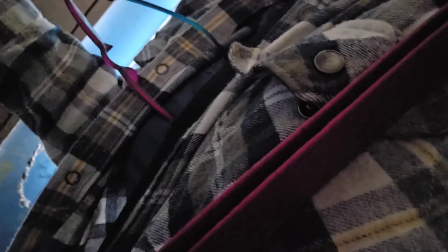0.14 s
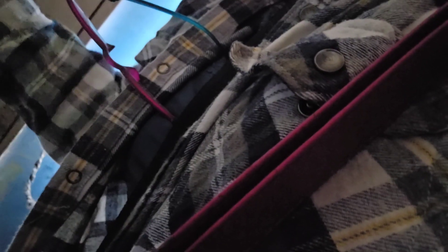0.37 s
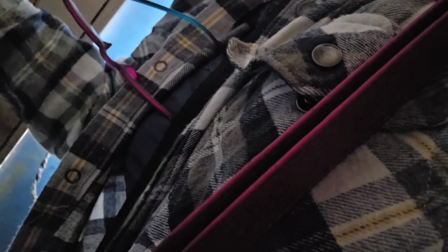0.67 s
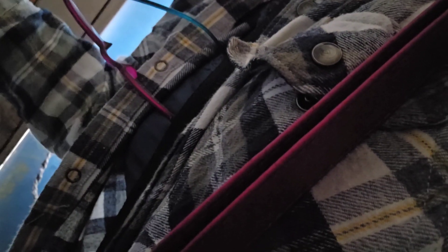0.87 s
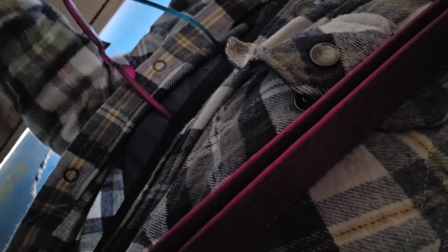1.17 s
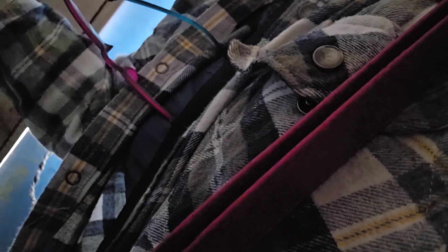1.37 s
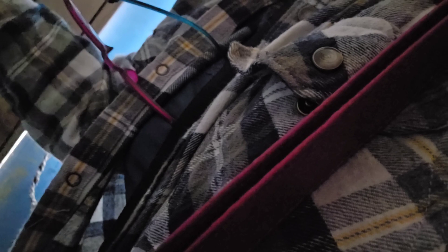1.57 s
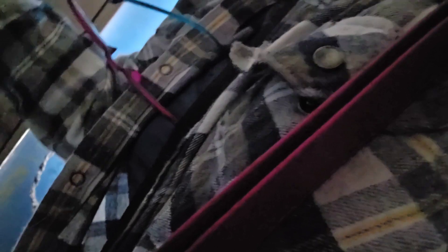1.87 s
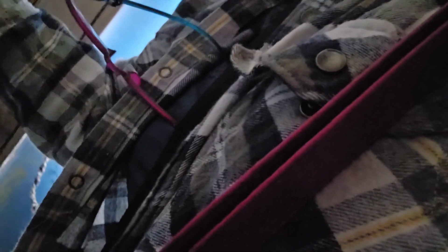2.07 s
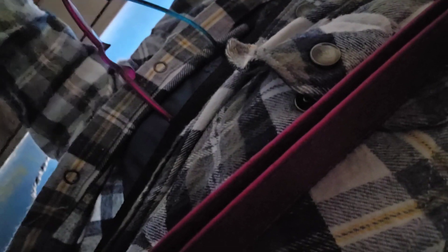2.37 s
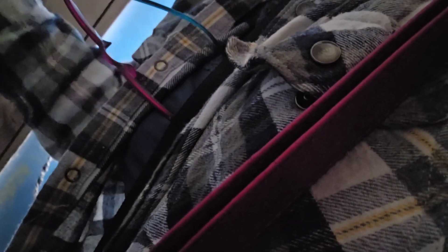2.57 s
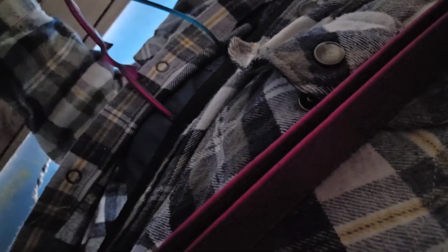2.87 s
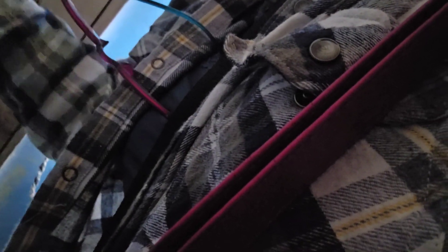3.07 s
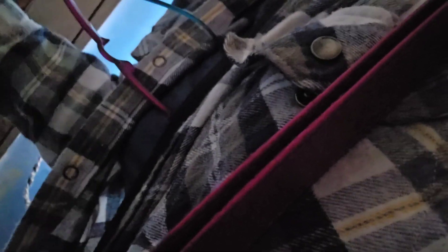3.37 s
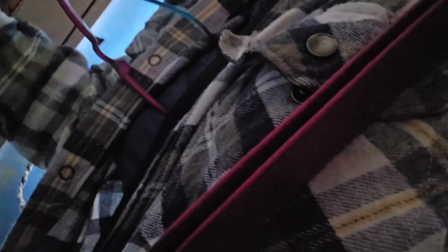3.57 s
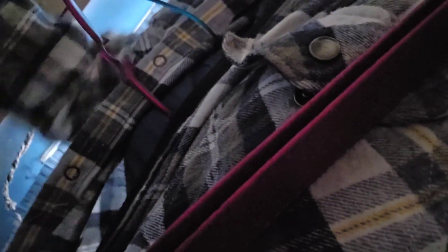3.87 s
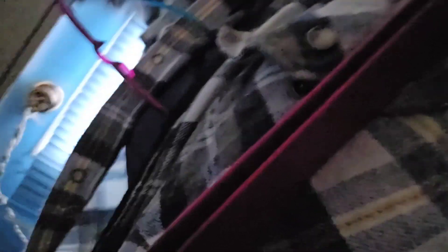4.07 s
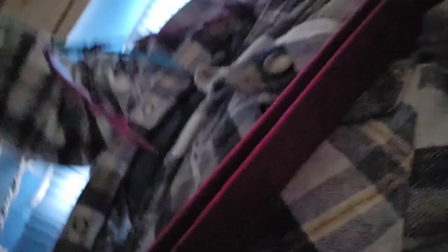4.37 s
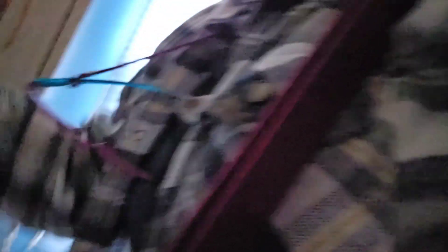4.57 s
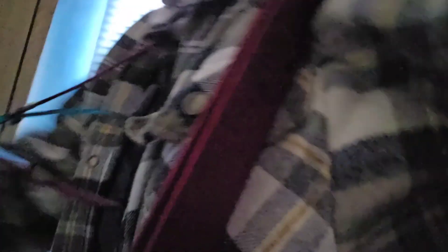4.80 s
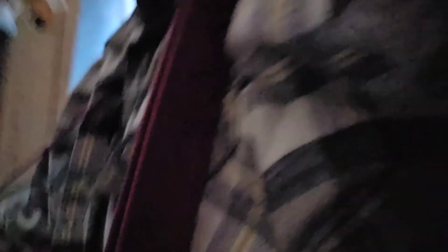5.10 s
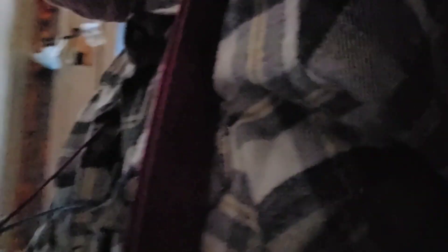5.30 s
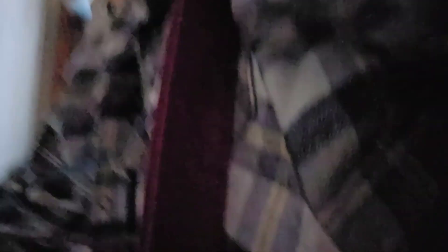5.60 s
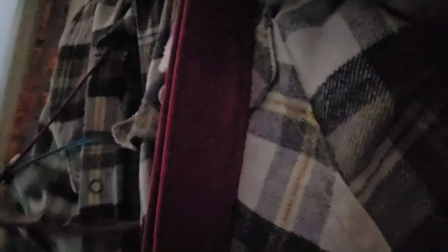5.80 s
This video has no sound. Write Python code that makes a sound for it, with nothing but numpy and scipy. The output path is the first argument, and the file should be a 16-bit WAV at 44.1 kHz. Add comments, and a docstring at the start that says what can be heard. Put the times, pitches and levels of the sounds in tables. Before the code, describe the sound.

Very close stereo pickup of shirts being pushed along a closet rail: thin, quickly damped metal clinks and scrapes, quieter light plastic ticks, then a busier run of chattering hooks with brushing cloth and muffled handling rumble. The last second has dull, woody hanger knocks, a short rough rising squeak and more rustle. The space is dry, with sound slightly stronger and brighter on the left.

```python
"""In a small closet, flannel shirts on plastic hangers are shoved in short strokes along a rail, right at the microphone.
Wire hooks ring in decaying sine modes and scrape in random slips; plastic arms tick and knock in short noise bursts.
Cloth rustles as dense coloured grains, and handling adds low noise bumps, rubbing and rumble.
Near the end one hook drags along the rail with a rising stick-slip squeak.
Levels in the tables are relative: each layer adds its own offset."""
import sys
import numpy as np
from scipy import signal
from scipy.fft import rfft, irfft, next_fast_len
from scipy.io import wavfile
from scipy.ndimage import map_coordinates

SR = 44100
rng = np.random.default_rng(int(sys.argv[2]) if len(sys.argv) > 2 else 0)


def store_pcm(level_fs):
    """Save levels as 16-bit WAV."""
    pcm = np.round(np.clip(level_fs, -1, 1) * 32767).astype(np.int16)
    wavfile.write(sys.argv[1], SR, np.atleast_2d(pcm).T)


N = 262218
TIME = np.arange(N) / SR
PUSHED_FROM_S = 3.2  # from here on the nearest hook is pushed along the rail

# ringing modes of the wire hook: (frequency [Hz], level [dB], t60 [s])
HOOK_MODES = [(2255,1.5,0.03),(4341,3.5,0.2),(5383,3.5,0.042),(7570,-6.5,0.11),(8655,-10.5,0.3),(9420,3.5,0.029),(9703,-14,0.12),(11230,-36.5,0.019),(12600,-1,.08),(13010,-21,0.33),(12607,-5,0.054),(12772,-1,0.11),(15000,-26,.05)]
# colour of a metal contact's crack: (frequency [Hz], level [dB])
CRACK_COLOUR = [(600,-34),(1700,-20.5),(2300,1.5),(3200,0),(6200,1),(9000,9.5),(10900,-1),(12500,-3.5),(15400,9.5),(16200,-31.5)]
# colour of a light, dry snap: (frequency [Hz], level [dB])
SNAP_COLOUR = [(500,-10),(1500,-6),(3000,2.5),(7500,3),(11000,0.5),(15300,-4.5),(16200,-44)]
# colour of a woody plastic body, also of brushed cloth: (frequency [Hz], level [dB])
BODY_COLOUR = [(250,-15.5),(600,2.5),(950,2.5),(1500,5),(2000,-2.5),(3300,-11.5),(6000,-70.5)]
# colour of a knock's crack and of the squeak's rasp: (frequency [Hz], level [dB])
KNOCK_COLOUR = [(1500,-4.5),(2300,1.5),(3300,0),(5000,-6),(8000,-8),(15000,-20)]


def from_db(db):
    """Decibels to gain."""
    return 10 ** (np.asarray(db) / 20)


def rms_one(x):
    """Scale to unit rms."""
    return x / np.sqrt(np.mean(x ** 2) + 1e-20)


def in_time(rows):
    """The columns of a curve, interpolated at every sample."""
    s, *columns = np.transpose(rows)
    return [np.interp(TIME, s, c) for c in columns]


def coloured(x, points, share=1):
    """Filter by a (Hz, dB) curve drawn over log frequency; share scales its decibels."""
    hz, db = np.transpose(points)
    size = next_fast_len(N)
    log_hz = np.log(np.arange(size // 2 + 1) * SR / size + 1)
    gain = from_db(share * np.interp(log_hz, np.log(hz), db))
    return irfft(rfft(x, size) * gain, size)[..., :N]


def pair(draws, alike):
    """Two unrelated signals become a left and a right that are partly alike."""
    alike = np.clip(alike, 0, 1)
    middle = np.sqrt(1 + alike) * draws[0]
    side = np.sqrt(1 - alike) * draws[1]
    return (middle + side * [[1], [-1]]) / np.sqrt(2)


def noise(points, alike):
    """Stereo noise of a given colour, rms 1."""
    return rms_one(coloured(pair(rng.standard_normal((2, N)), alike), points))


def drift(rate):
    """Random wander, rms 1, through `rate` new values per second."""
    knots = rng.standard_normal(N // 16)
    return rms_one(np.interp(TIME * rate, np.arange(len(knots)), knots))


def clicks(s, gains):
    """Impulses at the given times."""
    out = np.zeros(N)
    np.add.at(out, np.clip(np.round(s * SR).astype(int), 0, N - 1), gains)
    return out


def ring(force, hz, t60):
    """A two-pole resonator: a unit click sets a decaying sine of starting height 1 ringing."""
    r = from_db(-60 / (t60 * SR))
    w = 2 * np.pi * hz / SR
    return signal.lfilter([0, np.sin(w)], [1, -2 * r * np.cos(w), r * r], force + 1e-18)


def bursts(s, db, t60, rise, hold=0):
    """Envelope of blows or strokes that swell (60 dB per rise), may hold, and die away; their powers add."""
    power = np.zeros(N)
    for at, level, decay, swell, held in np.broadcast(s, db, t60, rise, hold):
        part = slice(max(int((at - 2 * swell) * SR), 0), int((at + held + 2 * decay) * SR))
        age = TIME[part] - at
        away = np.maximum((age - held) / decay, -age / swell)
        power[part] += from_db(level - 60 * np.maximum(away, 0)) ** 2
    return np.sqrt(power)


def grains(per_s, spread_db):
    """Random tiny slips of very uneven size, rms 1."""
    sizes = from_db(spread_db * np.minimum(rng.exponential(1, N), 3))
    struck = rng.random(N) < per_s / SR
    return rms_one(sizes * struck * pair(rng.standard_normal((2, N)), alike=0.096))


def gripped(pull):
    """The hook's modes under a grip that pulls the highest ones sharp."""
    top_hz = HOOK_MODES[-2][0]
    return [(hz * (1 + pull * (hz / top_hz) ** 4), db, t60) for hz, db, t60 in HOOK_MODES]


def hook_hits(hits, modes, low_hz, high_hz, ring_db, chatter_db, chatter_t60, crack_db, crack_t60, vary_db):
    """Where a wire hook is hit decides how its low and high modes share the blow; it then chatters on the rail."""
    s, high, low, crack = np.transpose(hits)
    crack_level = bursts(s, crack + crack_db, crack_t60, 0.0056)
    out = noise(CRACK_COLOUR, alike=0.13) * crack_level * from_db(3.56 * drift(400))
    rebounds = grains(per_s=2400, spread_db=11) / np.sqrt(SR * chatter_t60)
    for hz, db, t60 in modes:
        share = np.clip((hz - low_hz) / (high_hz - low_hz), 0, 1)
        chance = rng.standard_normal((len(s), 3))
        bright = crack + share * (high - crack)
        # the hook's main bending mode has a strength of its own
        bending = np.exp(-(np.log2(hz / low_hz) / .2) ** 2)
        level = bending * low + (1 - bending) * bright + db + ring_db
        # each side varies a little in level; both share a random sign
        sign = np.sign(chance[:, 2])
        blow = np.array([clicks(s, from_db(level + vary_db * side) * sign) for side in chance.T[:2]])
        chatter = rebounds * bursts(s, level + chatter_db, chatter_t60, 0.008)
        out += ring(blow + chatter, hz, t60)
    return out


def near_hook(free_db, low_lift_db, pushed_db, detune, snap_db, snap_t60):
    """Free hits ring with faint chatter, pushed hits chatter strongly; each group alternates two grip pitches."""
    # the nearest hook strikes the rail: (time [s], high ring level [dB], low ring level [dB])
    clinks = [(0.0998, -29, -67), (0.1558, -23, -63), (0.2103, -11.5, -48), (0.2341, -3.5, -38.5),
              (0.3369, -16, -82), (0.348, -20, -48), (0.545, -11.5, -62), (0.571, -16, -58),
              (0.6486, -58, -83), (0.789, -12.5, -53), (1.1938, -19.5, -55), (1.2253, -6.5, -45),
              (1.234, -6, -56), (1.3252, -45, -54), (1.354, -31, -69), (1.52, -42, -64),
              (1.5826, -16.5, -36), (1.877, -66, -66), (1.9363, -36.5, -64), (2.143, -39, -72),
              (2.357, -36, -64), (2.4117, -50, -73), (2.5247, -64, -54.5), (2.7795, -48, -46.5),
              (2.9574, -19, -47), (2.971, -26, -49), (3.232, -23.5, -40), (3.3696, -16.5, -61),
              (3.4615, -16, -55), (3.5328, -9, -42), (3.603, -14.5, -57), (3.6827, -12.5, -49),
              (3.7611, -23, -69), (3.829, -17.5, -72), (3.9096, -16.5, -67), (4.066, -21, -57),
              (4.0955, -14.5, -38), (4.1732, -11, -28), (4.2383, -8.5, -51), (4.2702, -6, -59),
              (4.285, -18, -67), (4.324, -28, -57), (4.4168, -31, -43), (4.4362, -9, -31),
              (4.501, -27.5, -55), (4.579, -10, -72), (4.6072, -12, -46), (4.655, -19, -36)]
    # the contact cracks harder the more the hook rings: [dB] at a mean ring of 0 dB, and dB per dB of ring
    crack_at_full_db, crack_growth = -21.5, 0.51
    s, high, low = np.transpose(clinks)
    crack = crack_at_full_db + crack_growth * (high + low) / 2
    hits = np.transpose([s, high, low, crack])
    free = hits[s < PUSHED_FROM_S] + [0, 0, low_lift_db, 0]
    pushed = hits[s >= PUSHED_FROM_S]
    out = noise(SNAP_COLOUR, alike=0.13) * bursts(s, high + snap_db, snap_t60, .002)
    for k, pull in enumerate((detune, 3 * detune)):
        out += hook_hits(free[k::2], gripped(pull), low_hz=4300, high_hz=14000, ring_db=free_db, chatter_db=-5,
                         chatter_t60=0.11, crack_db=5.0, crack_t60=0.015, vary_db=-0.5)
        out += hook_hits(pushed[k::2], gripped(pull), low_hz=4400, high_hz=12900, ring_db=pushed_db,
                         chatter_db=6, chatter_t60=.08, crack_db=3, crack_t60=.05, vary_db=1.5)
    return out


def neighbour_hook():
    """A neighbouring hook, thinner in tone, rings in its own modes and chatters."""
    # its hits: (time [s], high ring level [dB], low ring level [dB], contact crack level [dB])
    zings = [(0.0893, -14.5, -45, -74), (3.3405, -10.5, -50, -34.5), (3.7964, -19, -46, -65),
             (4.7272, -10, -42, -33), (4.8562, -18, -45, -40), (4.9207, -47, -54, -47),
             (5.0389, -18, -46, -31), (5.0568, -6, -48, -30), (5.1562, -33, -34, -31),
             (5.2169, -39, -56, -42.5)]
    # its modes: (frequency [Hz], level [dB], t60 [s])
    thin_modes = [(6400,10,0.011),(8280,-36,.08),(10500,12,0.09),(11840,5.5,0.05),(15100,-5.5,.06),(14300,-17,0.036)]
    return hook_hits(zings, thin_modes, low_hz=10400, high_hz=15000, ring_db=-8, chatter_db=13,
                     chatter_t60=0.036, crack_db=0, crack_t60=.075, vary_db=2)


def shove_strokes():
    """Each shove slides the hooks and drags the shirts: the envelopes of scrape and rustle."""
    # (time [s], length [s], hook scrape level [dB], cloth rustle level [dB])
    strokes = [(0.0, 0.0053, -50, -46), (0.101, 0.14, -47, -47), (0.553, 0.018, -47, -48.5),
               (0.694, 0.1, -51, -50.5), (1.446, 0.032, -68, -71), (3.282, 0.068, -48, -42),
               (3.454, 0.023, -44, -47), (3.583, 0.027, -39, -75), (3.68, .03, -38, -38.5),
               (3.864, 0.046, -38, -46.5), (4.01, 0.13, -46, -40), (4.2, 0.068, -48, -42.5),
               (4.412, 0.04, -48, -31.5), (4.648, 0.054, -35.5, -35.5), (4.822, 0.02, -95, -46),
               (5.798, 0.24, -47, -39)]
    build_s, settle_s = .15, .34  # time to swell and to die away by 60 dB
    s, length, *levels = np.transpose(strokes)
    return [bursts(s, db, settle_s, build_s, length) for db in levels]


def hook_scrape(level, damping, flutter_db, tilt_db, rasp_db, wander_db):
    """A sliding hook is plucked by many slips; pressed on the rail, it rings shorter and brighter, mode by mode."""
    slips = grains(per_s=830, spread_db=4)
    tones = 0
    for k, (hz, db, t60) in enumerate(gripped(pull=0.021)):
        tilt = tilt_db * np.log2(hz / HOOK_MODES[-1][0])
        gain = from_db(db + tilt + wander_db * drift(25))
        tones = tones + (-1) ** k * gain * ring(slips, hz, t60 * damping)
    rasp = from_db(rasp_db) * rms_one(coloured(slips, CRACK_COLOUR))
    return (rms_one(tones) + rasp) * level * from_db(flutter_db * drift(90))


def light_taps(per_s, level_db, damping):
    """The idle hooks keep touching the rail, faintly and at random."""
    touches = rng.random(N) < per_s / SR
    out = np.zeros(N)
    for hz, db, t60 in HOOK_MODES:
        out += ring(touches * from_db(level_db + db / 2) * rng.standard_normal(N), hz, t60 * damping)
    return out


def squeak(level_db, overtone_db, flutter_db, rasp_db):
    """Stick-slip at an unsteady rate gives a thin, rough tone over a dry rasp; overtones fall by the octave."""
    # the slips come faster as the hook gathers speed: (time [s], mean pitch [Hz])
    glide = [(5.62, 1392), (5.655, 1500), (5.708, 2078), (5.8, 2084), (5.84, 2254), (5.9, 2323)]
    from_s, hold_s, fade_s = 5.63, .225, .2  # full strength, how long it holds, 60 dB swell or fade
    hz, = in_time(glide)
    phase = 2 * np.pi * np.cumsum(hz * (1 + .052 * drift(1500))) / SR
    tone = np.zeros(N)
    for k in range(1, 6):
        tone += from_db(overtone_db * np.log2(k) + flutter_db * drift(220)) * np.sin(k * phase)
    rasp = from_db(rasp_db) * noise(KNOCK_COLOUR, alike=0.092)
    return (tone * from_db(3 * drift(45)) + rasp) * bursts(from_s, level_db, fade_s, fade_s, hold_s)


def ticks(tick_db, body_db, tick_t60, body_t60):
    """Light plastic contacts of arms and buttons: a dry snap with a little body."""
    # (time [s], snap level [dB], woody body level [dB])
    contacts = [(0.9003, -41, -44.5), (1.7404, -27.5, -90), (1.7856, -39.5, -59), (1.9983, -31.5, -40),
                (2.0424, -43, -53.5), (2.1916, -45.5, -45.5), (2.2625, -71, -46), (2.288, -39.5, -62),
                (2.78, -33, -43), (2.796, -29.5, -59), (2.822, -37, -58), (3.2981, -32.5, -39.5),
                (3.5726, -22, -69), (4.4, -56, -31), (4.6822, -22, -39), (4.7185, -19.5, -36),
                (4.7604, -27, -70), (4.8304, -24, -77)]
    s, snap, body = np.transpose(contacts)
    out = noise(SNAP_COLOUR, alike=0.083) * bursts(s, snap + tick_db, tick_t60, 0.00033)
    return out + noise(BODY_COLOUR, alike=0.97) * bursts(s, body + body_db, body_t60, 0.0012)


def knocks(ring_db, clack_db, crack_db, clack_t60, crack_t60, swell):
    """Heavy contacts ring the hanger arms, muffled by the shirts on them."""
    # hangers knock together: (time [s], level [dB], crack level [dB])
    collisions = [(5.074, -16, -35), (5.081, -19.5, -29), (5.143, -29, -51), (5.299, -35, -40.5),
                  (5.376, -29.5, -36), (5.454, -28.5, -32.5), (5.482, -16.5, -32), (5.545, -27.5, -32.5),
                  (5.581, -23.5, -28), (5.722, -31, -30), (5.928, -18.5, -27.5)]
    # modes of a loaded hanger: (frequency [Hz], level [dB], t60 [s])
    arm_modes = [(770,-6,.08),(912,-10,.05),(1200,-8,.06),(1380,-2,.035),(1495,5,.06),(1640,-3,.03),(3180,-16,.03)]
    s, level, crack = np.transpose(collisions)
    out = noise(BODY_COLOUR, alike=0.077) * bursts(s, level + clack_db, clack_t60, swell)
    out += noise(KNOCK_COLOUR, alike=0.057) * bursts(s, crack + crack_db, crack_t60, swell)
    for hz, db, t60 in arm_modes:
        chance_db = 6.8 * rng.standard_normal(len(s))
        out += ring(clicks(s, from_db(level + db + ring_db + chance_db)), hz, t60)
    return out


def cloth(level, colour, clump_db):
    """Fibres catch and let go in clumps."""
    fibres = grains(per_s=17000, spread_db=4.0) * from_db(clump_db * drift(110))
    return level * rms_one(coloured(fibres, colour))


def shirts_and_sleeve(rustle, shove, grip_db):
    """Shirts rustle with each shove and stir between them; a sleeve brushes the microphone, duller in colour."""
    # colour of the flannel: (frequency [Hz], level [dB])
    flannel = [(500,-8.5),(1700,-5),(2250,2.5),(3500,0.5),(6500,3.5),(9500,4),(10900,1),(15300,3.5),(15900,-11)]
    stir_db, shove_brush_db = -10, -15.5  # stirring relative to the grip, brushing relative to the shove's rustle
    sleeve_db, sleeve_growth = 5, 1.203  # brushing at a grip of 0 dB, and its dB per dB of grip
    shirts = from_db(-5.0) * cloth(np.hypot(rustle, from_db(grip_db + stir_db)), flannel, clump_db=3.5)
    brushing = np.hypot(from_db(sleeve_db + sleeve_growth * grip_db), from_db(shove_brush_db) * shove)
    return shirts + cloth(brushing, BODY_COLOUR, clump_db=10)


def hand_grip():
    """How firmly the hand rubs on the microphone's body, in dB over time."""
    # (time [s], level [dB])
    firmness = [(0, -76), (.7, -92), (.85, -71.5), (2.2, -63.5), (2.6, -70.5), (3.35, -53), (3.6, -62),
                (4.6, -53.5), (5.0, -59), (5.5, -50), (5.95, -44.5)]
    grip_db, = in_time(firmness)
    return grip_db


def handling(grip_db, shove, bump_db, thump_db, bump_t60, rub_db, fumble_db, rumble_db, tremor_db):
    """Soft bumps, uneven rubbing and the rumble of a lurching hand, carried through the body of the microphone."""
    # soft handling bumps: (time [s], level [dB])
    bumps = [(0.816, -37), (0.897, -35), (0.969, -42.5), (1.288, -42), (1.345, -37), (1.681, -41),
             (1.904, -38), (2.034, -40), (2.19, -36), (2.257, -45), (2.376, -44.5), (2.778, -31.5),
             (2.875, -36.5), (3.058, -38), (3.234, -28), (3.271, -18.5), (3.298, -23.5), (3.466, -35.5),
             (3.688, -24.5), (4.034, -29.5), (4.165, -27.5), (4.409, -26.5), (4.654, -21.5), (4.707, -19),
             (4.726, -27.5), (5.067, -29), (5.15, -24), (5.462, -28), (5.606, -29.5), (5.879, -25.5),
             (5.928, -25.5)]
    # the hand lurches and the microphone rumbles: (time [s], level [dB])
    lurches = [(1.441, -52.5), (3.31, -30), (3.701, -35.5), (4.22, -48.5), (4.419, -34), (4.728, -26),
               (5.21, -41), (5.479, -25.5), (5.92, -31.5)]
    # colours of bumps and rubbing, of the deeper thumps, and of the rumble: (frequency [Hz], level [dB])
    bump_colour = [(30,-21.5),(70,-17.5),(105,-20.5),(140,-3.5),(190,5),(240,-4),(390,1),(540,-10),(750,-22.5),(1500,-29),(4000,-33.5)]
    thump_colour = [(50, -19), (140, 2), (195, 0), (320, -23), (900, -58)]
    rumble_colour = [(12,6),(28,-6.5),(45,-1.5),(65,-0.5),(100,-3.5),(200,-18),(500,-49)]
    thump_growth = 1.65  # dB of depth per dB of bump
    lurch_build_s, lurch_settle_s = 0.23, 0.24  # time to swell and to die away by 60 dB
    wobble_db, wobble_s = -12, 0.79  # the slow wobble a lurch leaves: level relative to it, t60
    shove_rub_db = -13.5  # a shove's rubbing relative to its rustle

    s, level = np.transpose(bumps)
    thuds = bursts(s, level + bump_db, bump_t60, 0.028)
    rub = np.hypot(from_db(grip_db + rub_db), from_db(shove_rub_db) * shove)
    rub = rub * from_db(fumble_db * drift(25))
    dull = noise(bump_colour, alike=0.74) * np.hypot(thuds, rub)
    # heavy bumps also sound deeper
    dull += noise(thump_colour, alike=0.99) * bursts(s, thump_growth * level + thump_db, bump_t60, 0.023)

    s, level = np.transpose(lurches)
    sway = bursts(s, level, lurch_settle_s, lurch_build_s)
    sway += bursts(s, level + wobble_db, wobble_s, lurch_build_s)
    shaking = np.hypot(from_db(rumble_db) * sway, from_db(grip_db + tremor_db))
    return dull + noise(rumble_colour, alike=0.84) * shaking


def thin_bass(x):
    """Thin wire and cloth give off little bass."""
    # (frequency [Hz], level [dB])
    small_source = [(80, -22), (500, -1)]
    return coloured(x, small_source)


def swinging(x):
    """Reflections off the moving hangers give every contact a slightly different colour."""
    # (path delay [s], level [dB])
    paths = [(.0009, -9), (.0017, -18), (.0029, -13)]
    swing_s, swings_per_s = .00008, 6  # how far (rms) and how often the delays wander
    out = x.copy()
    for delay, db in paths:
        when = TIME - delay - swing_s * drift(swings_per_s)
        out += from_db(db) * np.array([map_coordinates(side, [when * SR], order=2) for side in x])
    return out / np.sqrt(1 + sum(from_db(db) ** 2 for _, db in paths))


def closet(x, echo_db, t60):
    """The sound reaches the left port first; close walls scatter it, and clothes soak up the tail."""
    port_lag_s = .00034
    age = TIME[:SR // 2]
    tail = rng.standard_normal((2, len(age))) * (age > .003) * from_db(-60 * age / t60)
    tail *= from_db(echo_db) / np.sqrt(np.sum(tail ** 2, axis=1, keepdims=True))
    direct = np.array([x[0], np.interp(TIME - port_lag_s, TIME, x[1])])
    return direct + signal.fftconvolve(x, tail, axes=1)[:, :N]


def shaded(left, right):
    """The left side is nearer and less shaded: each side takes a share of the difference in colour."""
    # whole left-minus-right curve: (frequency [Hz], difference [dB])
    side_difference = [(60,3),(200,3.5),(380,-5),(800,4),(2400,2),(4400,7.5),(8600,3),(12000,15)]
    return np.array([coloured(left, side_difference, 0.35), coloured(right, side_difference, -0.17)])


def quiet_floor(level_db):
    """A faint, steady noise floor, nearly unrelated left and right."""
    # (frequency [Hz], level [dB])
    floor_colour = [(30,-9),(400,12),(1600,3),(2200,16.5),(3000,0.5),(5300,11),(7000,-27.5),(15000,-30)]
    return from_db(level_db) * noise(floor_colour, alike=0.1)


def scene():
    """Hooks, plastic and cloth in the closet, over handling noise and a quiet floor."""
    scrape, rustle = shove_strokes()
    grip_db = hand_grip()
    shove = rustle * (TIME > PUSHED_FROM_S)  # only these strokes brush and rub the microphone
    hooks = near_hook(free_db=-8.5, low_lift_db=10.5, pushed_db=-7.5, detune=0.00642, snap_db=-27, snap_t60=0.0065)
    hooks += neighbour_hook()
    hooks += hook_scrape(scrape, damping=0.21, flutter_db=6.5, tilt_db=8.5, rasp_db=-6, wander_db=7)
    hooks += light_taps(per_s=26, level_db=-56, damping=0.22)
    hooks += squeak(level_db=-32.5, overtone_db=-10, flutter_db=2, rasp_db=-16)
    plastic = ticks(tick_db=-5, body_db=3.0, tick_t60=0.016, body_t60=0.034)
    plastic += knocks(ring_db=-9, clack_db=-5.5, crack_db=-1, clack_t60=0.084, crack_t60=0.073, swell=0.01)
    fabric = shirts_and_sleeve(rustle, shove, grip_db)
    air = closet(swinging(thin_bass(hooks + fabric)) + plastic, echo_db=-6.0, t60=0.11)
    body = handling(grip_db, shove, bump_db=-8.5, thump_db=-0.5, bump_t60=0.19, rub_db=-4.0, fumble_db=4,
                    rumble_db=-0.5, tremor_db=-14)
    left, right = air + body
    return shaded(left, right) + quiet_floor(level_db=-79)


def record(dry):
    """A steep elliptic low-pass cuts the top."""
    cutoff_hz = 15800
    low_pass = signal.ellip(10, .2, 80, cutoff_hz, fs=SR, output="sos")  # order, ripple dB, stop-band dB
    return signal.sosfilt(low_pass, dry)


dry = scene()
out = record(dry)
store_pcm(out)
```